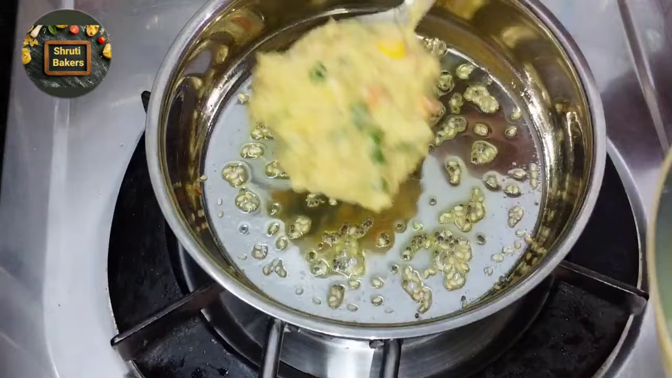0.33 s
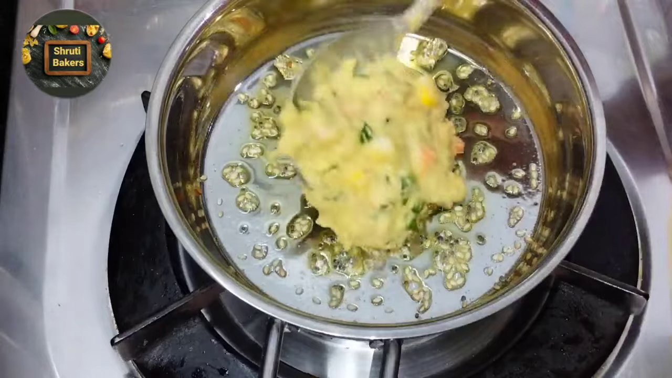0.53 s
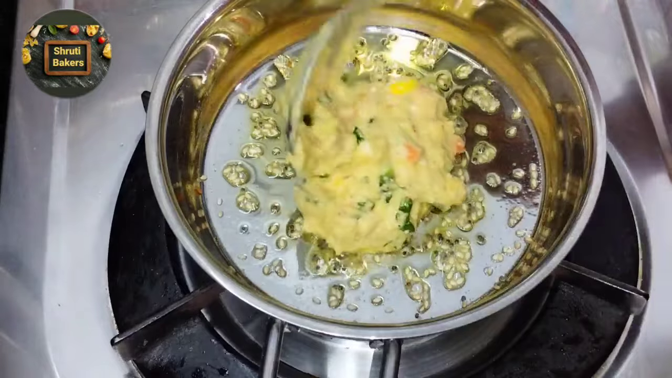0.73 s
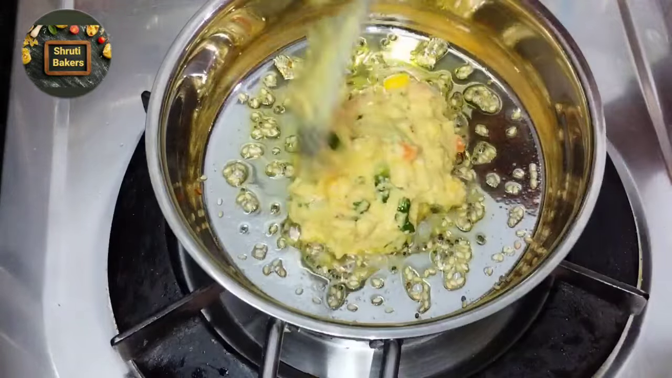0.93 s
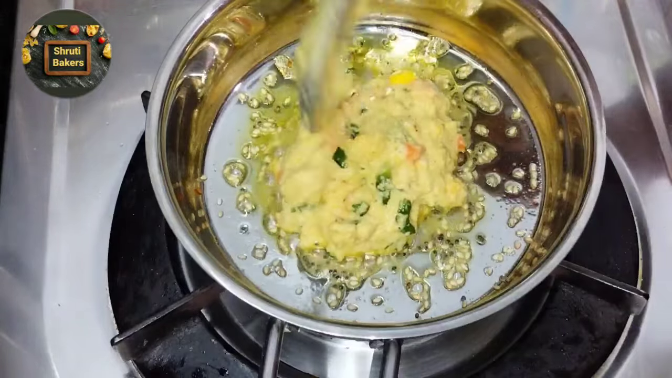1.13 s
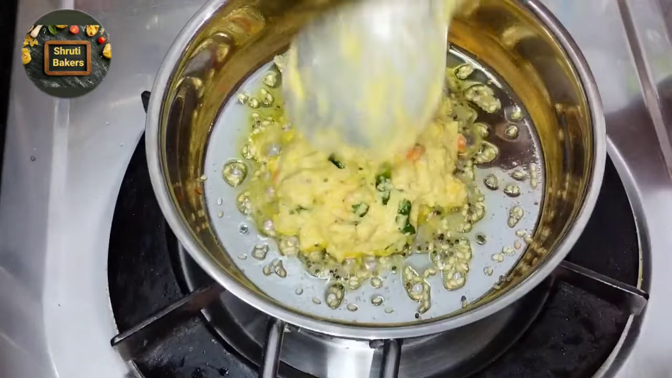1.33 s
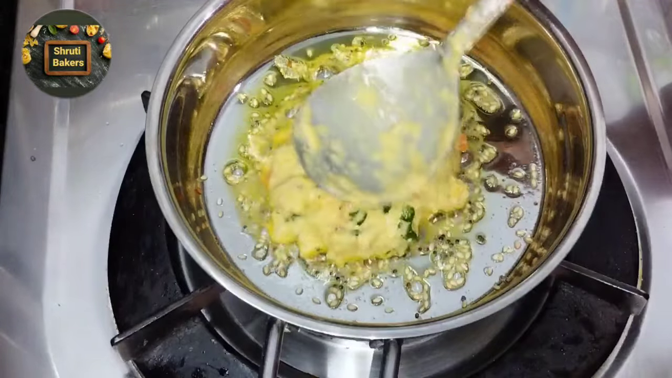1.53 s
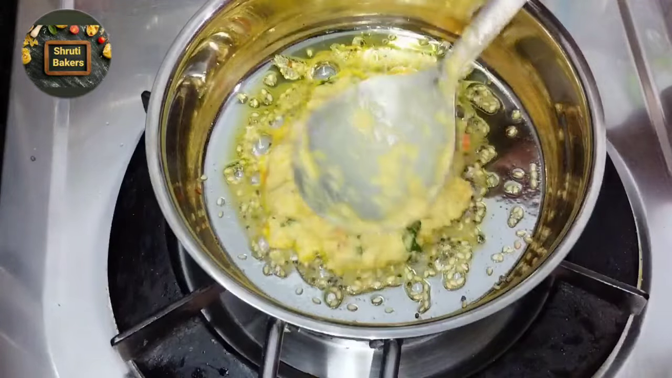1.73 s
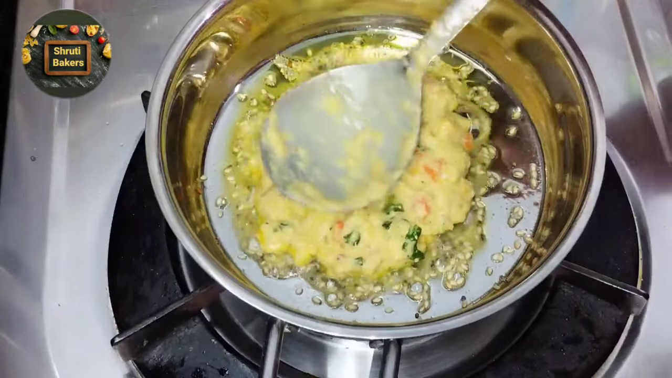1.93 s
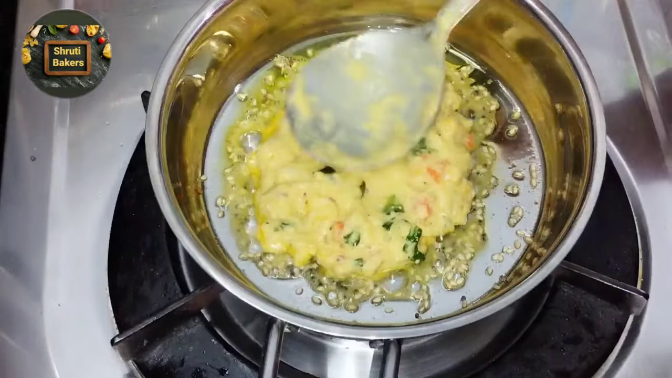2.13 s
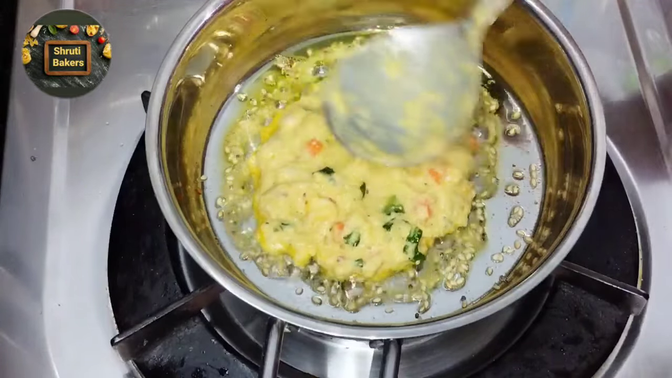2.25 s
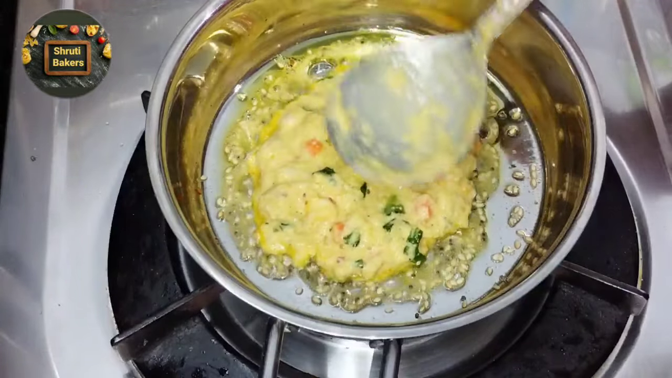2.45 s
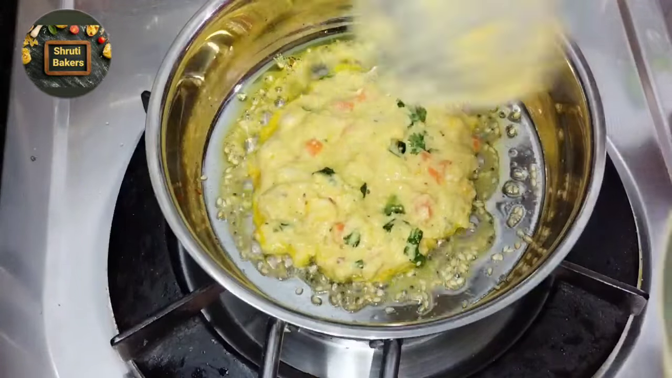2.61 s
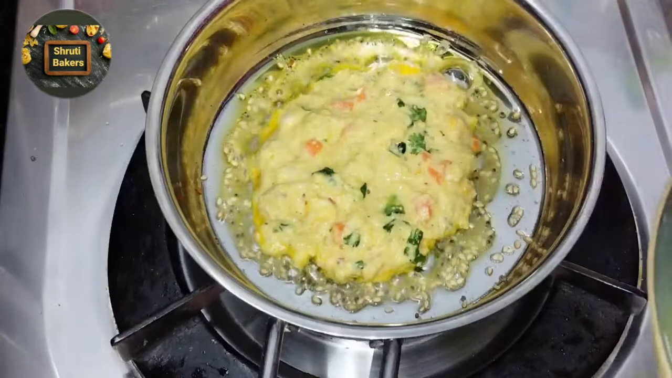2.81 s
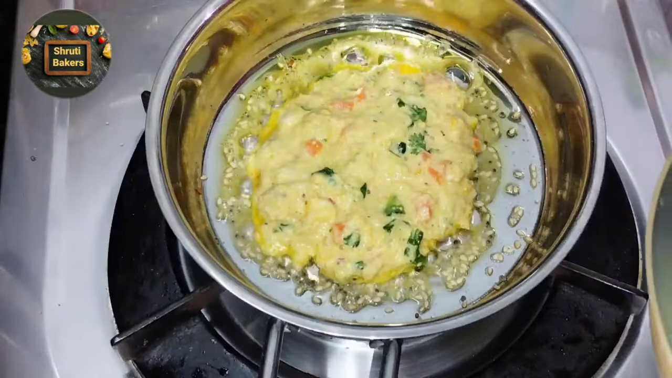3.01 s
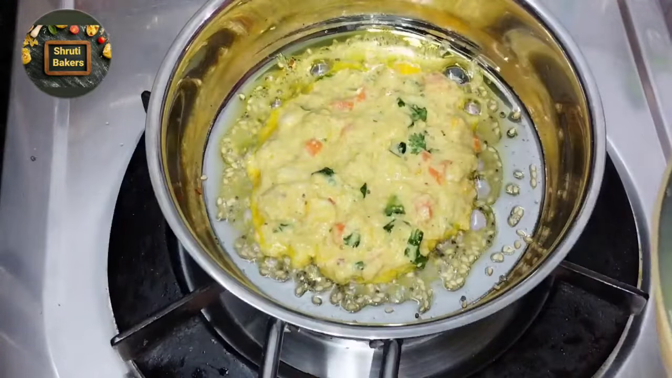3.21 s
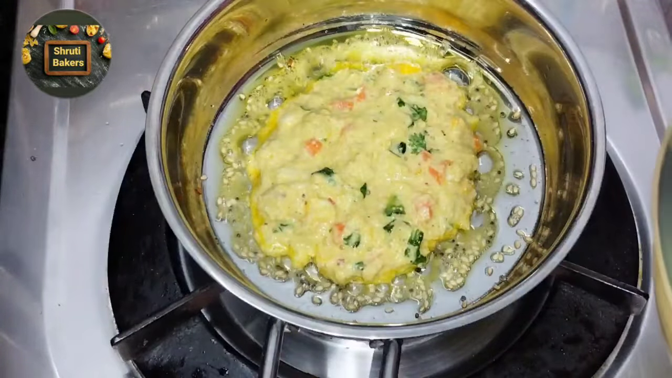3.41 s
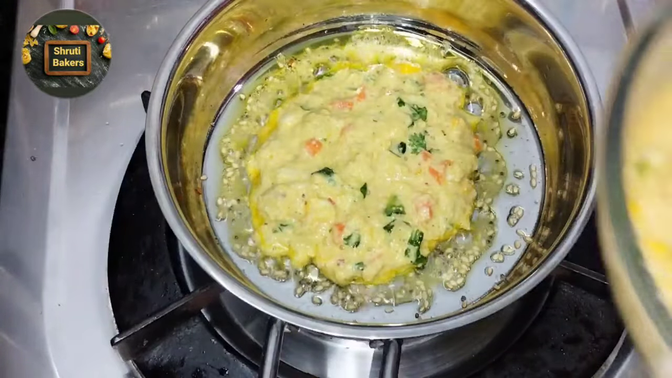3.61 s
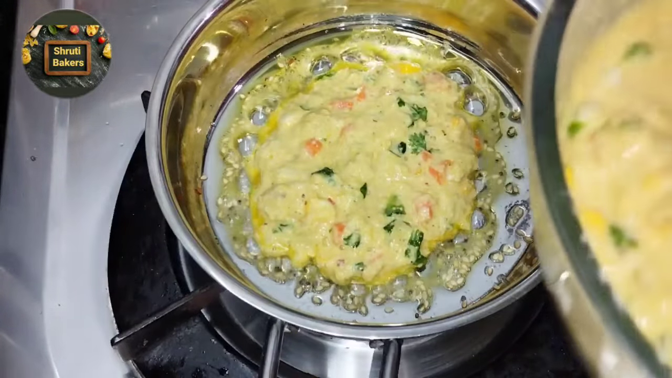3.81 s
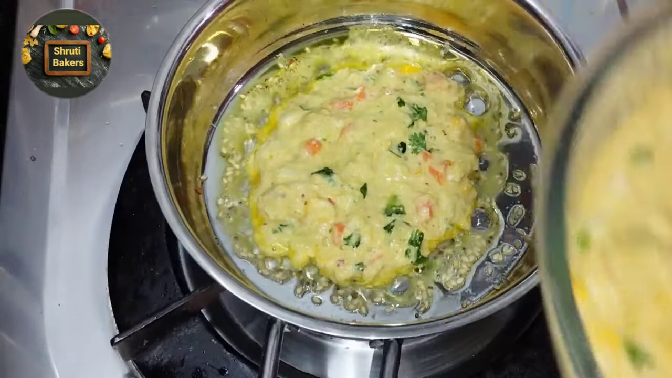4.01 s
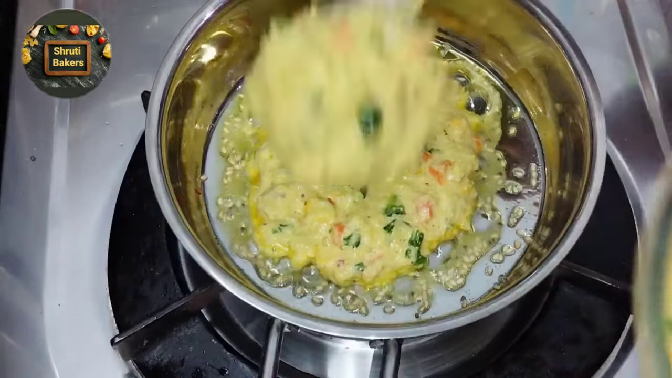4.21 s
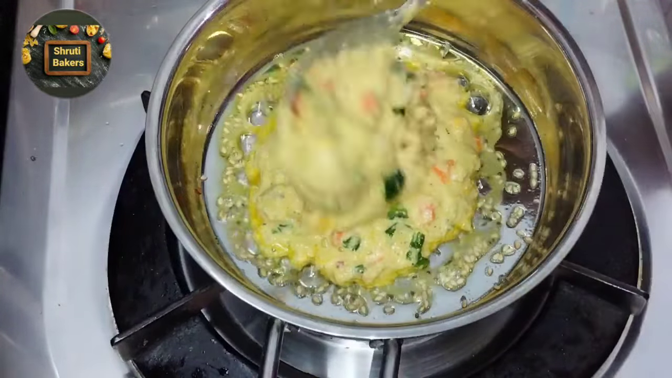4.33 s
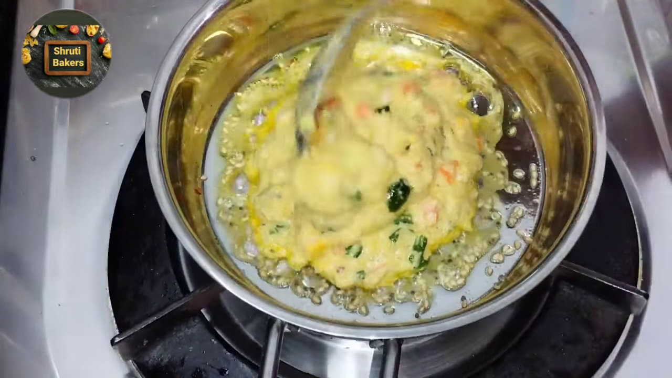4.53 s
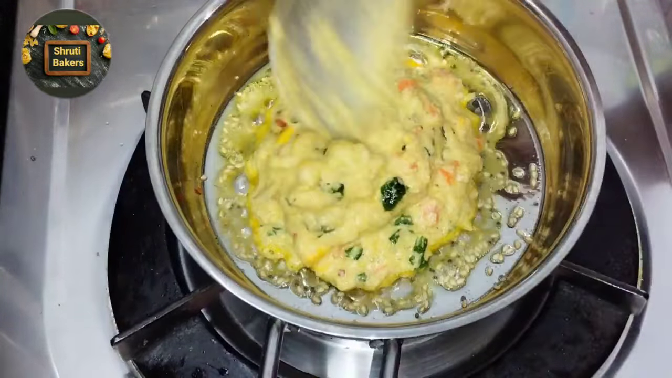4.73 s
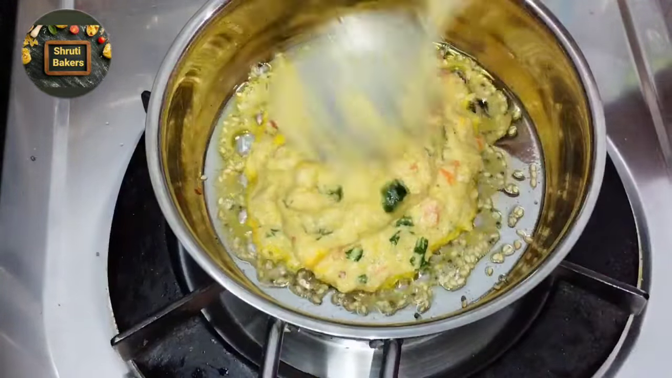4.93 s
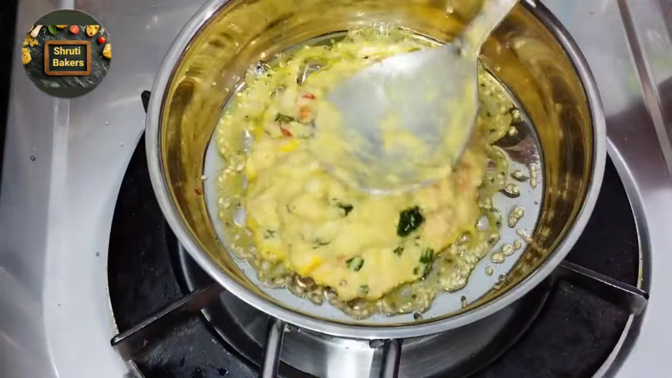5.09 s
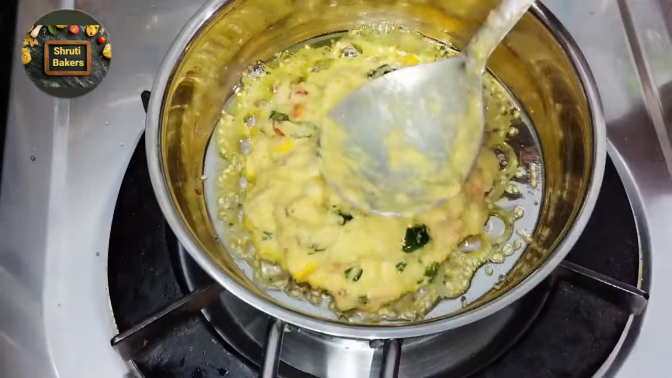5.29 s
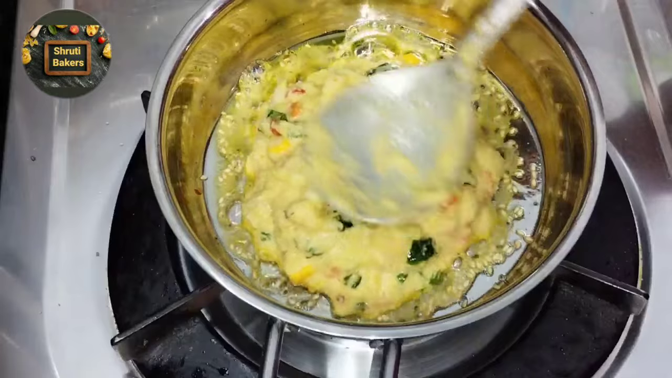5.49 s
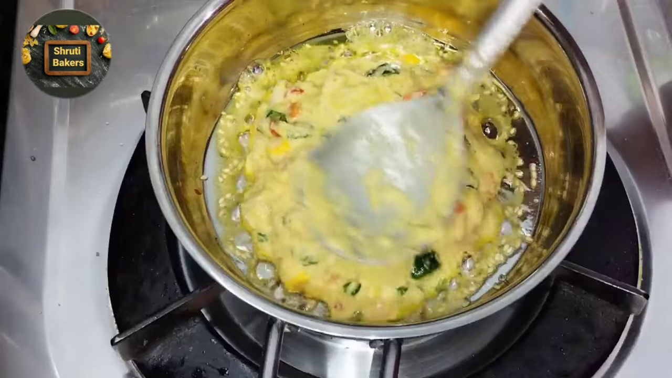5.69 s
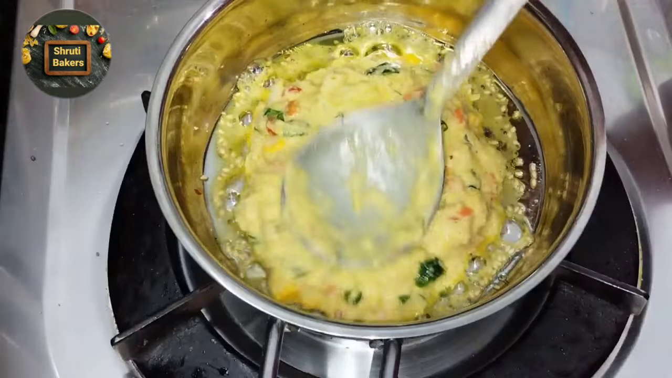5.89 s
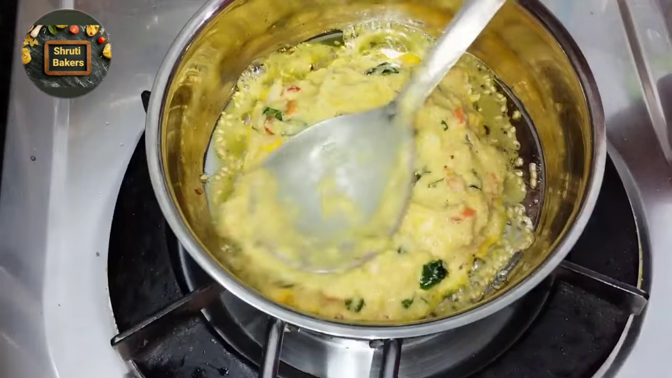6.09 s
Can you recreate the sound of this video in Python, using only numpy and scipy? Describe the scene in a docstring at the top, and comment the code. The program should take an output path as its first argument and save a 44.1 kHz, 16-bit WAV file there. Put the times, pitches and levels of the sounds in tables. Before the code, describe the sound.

Wet batter drops into hot oil in a steel pan and bursts into bright crackling sizzle, fades, then swells again with a second ladleful.

```python
"""Batter fries in hot oil in a steel pan, heard close: two ladlefuls are dropped and spread.
Each is a rising and fading mass of random bubble bursts, coloured by the pan; flares swell in it.
Pops are short decaying sines for the crack, with a hiss of flung oil and a knock on the pan.
A fan hums underneath as wavering tones over filtered noise; a gas burner whistles thinly in narrow
bands and fades over the first three seconds."""
import sys
import numpy as np
from scipy import signal
from scipy.fft import rfft, irfft, next_fast_len
from scipy.io import wavfile
from scipy.ndimage import uniform_filter1d, map_coordinates

SR = 44100
rng = np.random.default_rng(int(sys.argv[2]) if len(sys.argv) > 2 else 0)


def output_pcm(signal):
    """Save a mono or channel-first signal as 16-bit PCM at the path in sys.argv[1].

    Samples are clipped to [-1, 1] before scaling.
    """
    pcm = np.clip(np.atleast_2d(signal).T, -1, 1) * 32767
    wavfile.write(sys.argv[1], SR, np.round(pcm).astype(np.int16))


N = 271215


def amp(db):
    """Decibels to gain."""
    return 10 ** (np.asarray(db) / 20)


def unit(x):
    """x at rms 1."""
    return x / np.sqrt(np.mean(x ** 2) + 1e-20)


def along(points, hz):
    """(Hz, value) points read on a log frequency axis."""
    f, v = np.transpose(points)
    return np.interp(np.log(hz + 1), np.log(f + 1), v)


def clock():
    """The time of every sample in seconds."""
    return np.arange(N) / SR


def wobble(rate):
    """A smooth random curve with this many knots a second."""
    knots = rng.standard_normal(int(N * rate / SR) + 4)
    return map_coordinates(knots, [clock() * rate])


def filtered(x, response):
    """x times a response of frequency."""
    m = next_fast_len(N + SR // 2)
    hz = np.fft.rfftfreq(m, 1 / SR)
    return irfft(rfft(x, m) * response(hz), m)[:N]


def band(x, centre_hz, width_hz):
    """The part of x around one frequency."""
    return filtered(x, lambda hz: np.exp(-((hz - centre_hz) / width_hz) ** 2))


# Hum lines of the fan. Each row: pitch in Hz, rms level in dB before the slow drift, unsteadiness 0-1.
HUM_LINES = [(63.4, -57, 0.5), (88.9, -40.5, 0.02), (141.3, -62, 0.1), (177.4, -55, 0), (220, -60.5, 0.66),
             (274.5, -64.5, 0.28), (298.7, -63.5, 1)]
# Tone colour of the air rush. Each row: frequency in Hz, relative density in dB per Hz.
AIR_COLOUR = [(20, 0.5), (32, 2), (48, -11), (110, -6.5), (220, -8.5), (400, -12.5), (900, -20.5),
              (1600, -22), (2500, -28), (4500, -33), (8500, -27.5), (15000, -43)]
HUM_WAVER_DB = 1.5  # slow drift of the fan's level
HUM_START_DB, HUM_SETTLE_S = -1.5, 1.6  # the fan starts a little softer


def fan():
    """Slightly unsteady hum lines over a soft rush of air, drifting in level together."""
    t = clock()
    hum = 0
    for hz, db, unsteady in HUM_LINES:
        sway = 1 - unsteady + unsteady * (wobble(7) + 1j * wobble(7))
        tone = np.exp(2j * np.pi * (hz * t + rng.random()))
        hum = hum + amp(db) * unit(np.real(sway * tone))
    rush = filtered(rng.standard_normal(N), lambda hz: amp(along(AIR_COLOUR, hz)))
    air = amp(-49) * unit(rush)
    start_db = HUM_START_DB * np.maximum(1 - t / HUM_SETTLE_S, 0)
    return (hum + air) * amp(HUM_WAVER_DB * wobble(5) + start_db)


# Whistle bands of the gas jet. Each row: centre in Hz, width in Hz, rms level in dB before the fade.
WHISTLE_BANDS = [(1030, 29, -72), (1320, 36, -67.5), (1960, 62, -65), (2710, 22, -74), (3184, 34, -57.5),
                 (3670, 30, -68)]


def burner():
    """The gas jet sings in a few narrow, restless bands and soon fades."""
    t = clock()
    whistle = 0
    for hz, width_hz, db in WHISTLE_BANDS:
        flutter = 1.1 + wobble(2 * width_hz) + 1j * wobble(2 * width_hz)
        whistle = whistle + amp(db) * unit(np.real(flutter * np.exp(2j * np.pi * hz * t)))
    return whistle * np.interp(t, [0, .5, 1.5, 3], [0.88, 0.91, 0.45, 0.05])


# Resonances of the pan and the air in it. Each row: centre in Hz, width in Hz, boost in dB.
PAN_RESONANCES = [(707, 160, 7.5), (973, 30, 8), (1130, 120, 0), (1387, 71, 2), (1830, 17, 7.5),
                  (1913, 53, 3), (2050, 58, 4.5), (2900, 310, 5), (3120, 40, 5.5), (3660, 62, 6),
                  (3940, 21, 6), (4530, 45, 4), (4700, 36, 0.5)]


def click(colour, size=4096):
    """One burst in the pan: the causal impulse of this colour with the pan's resonances, energy 1."""
    hz = np.fft.rfftfreq(size, 1 / SR)
    db = along(colour, hz)
    for centre_hz, width_hz, boost_db in PAN_RESONANCES:
        db = db + boost_db / (1 + (2 * (hz - centre_hz) / width_hz) ** 2)
    # fold the cepstrum forward so that the sound starts at once (minimum phase)
    cepstrum = irfft(np.log(amp(db)))
    cepstrum[1:size // 2] *= 2
    cepstrum[size // 2 + 1:] = 0
    pulse = irfft(np.exp(rfft(cepstrum)))
    return pulse / np.linalg.norm(pulse)


def bursts(rate, spread_db):
    """Impulses of uneven size and random sign at random moments, rate a second, at rms 1."""
    chance = np.clip(rate / SR, 1e-5, 1)
    size_db = spread_db * np.clip(rng.standard_normal(N), -2, 2)
    size = amp(size_db) * rng.choice([-1, 1], N)
    return unit(size * (rng.random(N) < chance) / np.sqrt(chance))  # even power at any rate


def kitchen(x, t60, wet_db, count=4):
    """x with the quick echoes of pan wall, stove and tiles; each spot of the pan echoes differently."""
    t = np.arange(SR // 3) / SR
    tails = rng.standard_normal((count, len(t))) * amp(-60 * t / t60) * (t > .001)
    spot = rng.integers(count, size=N)
    echoes = 0
    for k, tail in enumerate(tails):
        echoes = echoes + signal.fftconvolve(x * (spot == k), tail / np.linalg.norm(tail))[:N]
    return x + amp(wet_db) * echoes


POP_HZ, POP_SCATTER = 8400, 0.07  # usual ring of a cavity, its relative spread among the lesser pops
SMALL_CRACK_DB, SMALL_SPRAY_DB, SMALL_KNOCK_DB = 2, -10, -27  # row levels against the steady fizz
SMALL_POP_SPREAD_DB = 5  # how far they stray in strength, up or down


def small_pops(steady, count):
    """Rows of lesser pops at random moments once the batter is in the oil, stronger in harder frying."""
    when, size, pitch = rng.random((count, 3)).T
    landing_s = LADLEFULS[0][0]
    times = landing_s + when * (N / SR - landing_s)
    fizz_db = 10 * np.log10(np.interp(times, clock(), steady))
    db = fizz_db + SMALL_POP_SPREAD_DB * (2 * size - 1)
    ring_hz = POP_HZ * np.exp(POP_SCATTER * (2 * pitch - 1))
    return zip(times, db + SMALL_CRACK_DB, db + SMALL_SPRAY_DB, ring_hz, db + SMALL_KNOCK_DB)


# Water pops in the oil. Each row: start in seconds, relative crack level in dB, relative spray level
# in dB, ring of the cavity in Hz, relative knock on the pan in dB.
WATER_POPS = [(0.3123, -16.5, -25, 9000, -45), (0.3647, -17.5, -33.5, 8200, -36),
              (0.9485, -15, -31, 8500, -39), (1.1852, -19, -38, 8800, -49), (1.3596, -19, -24, 9400, -51),
              (1.5684, -10, -32, 8600, -33), (1.6565, -18, -29, 8500, -30), (2.3786, -11.5, -28, 9400, -47),
              (2.4293, -11, -24, 8160, -23), (2.6119, -17, -34, 8400, -41), (2.806, -16, -27, 6600, -36),
              (3.0852, -9, -19, 8150, -37), (3.2869, -15, -27.5, 8900, -31.5),
              (3.568, -4.5, -26, 8300, -23.5), (3.749, -14, -22, 9300, -25),
              (3.8828, -19.5, -31.5, 8250, -40), (4.1547, -25, -36, 8200, -44),
              (4.2086, -20, -32.5, 9200, -43), (4.4835, -23, -31, 7800, -38),
              (4.9133, -8.5, -31, 7960, -26.5), (4.9903, -17, -45, 7700, -54), (5.8535, -7, -24, 8100, -37)]
# Tone colour of a pop's spray. Each row: frequency in Hz, relative density in dB per Hz.
SPRAY_COLOUR = [(150, -27), (500, -28), (1500, -21), (4000, -16.5), (6000, -5.5), (8200, 3.5),
                (10500, -1.5), (13000, -5), (16000, -13)]
# Tone colour of a pop's knock on the pan. Each row: frequency in Hz, relative density in dB per Hz.
KNOCK_COLOUR = [(100, -23), (300, 0), (800, 3.5), (1600, 10), (3000, 10), (6000, -4), (16000, -7)]
TEAR_SHARE, TEAR_GROWS = 0.3, 5.9  # film tear at the usual ring; it grows as this power of the pitch


def pops():
    """Each pop is a sharp crack that knocks the pan; its flung droplets hiss away on the hot steel."""
    t = np.arange(SR // 3) / SR
    cracks, knocks, spray_level = np.zeros((3, N + SR))
    fading = amp(-60 * t / 0.16) + 1.04 * amp(-60 * t / 0.015)
    tear = np.sin(2 * np.pi * 12800 * t) * amp(-60 * t / .0006)
    steady, _ = batter()
    for s, crack_db, spray_db, hz, knock_db in [*WATER_POPS, *small_pops(steady, count=22)]:
        at = round(s * SR)
        # the oil film tears and the opened cavity rings for a few cycles
        cavity = np.sin(2 * np.pi * hz * t) * amp(-60 * t / .0011)
        flow = cavity + TEAR_SHARE * (hz / POP_HZ) ** TEAR_GROWS * tear
        # changing flow is what radiates
        cracks[at:at + len(t)] += amp(crack_db + 15) * np.diff(flow, prepend=0)
        knocks[at] += amp(knock_db + 16)
        spray_level[at:at + len(t)] += amp(spray_db + 0.5) * fading
    near_wall = np.roll(cracks, round(.0005 * SR))
    far_wall = np.roll(cracks, round(.00124 * SR))
    cracks = (cracks + 0.059 * near_wall + 0.16 * far_wall)[:N]
    spray = kitchen(spray_level[:N] * bursts(5000, spread_db=3.5), t60=0.27, wet_db=-4)
    spray = signal.fftconvolve(spray, click(SPRAY_COLOUR))[:N]
    knocks = kitchen(knocks[:N], t60=0.17, wet_db=-7.5)
    knocks = signal.fftconvolve(knocks, click(KNOCK_COLOUR))[:N]
    return cracks + spray + knocks


# Ladlefuls of batter; the second lands on the first and reaches the oil slowly.
# Each row: landing in seconds, relative fizz level in dB, rise in seconds, time it stays wet in seconds.
LADLEFULS = [(0.525, -20, 0.16, 1.66), (4.3, -26, 1.45, 1.75)]
SAG_DB_PER_S, CRUST_DB_PER_S = 1.5, 9  # the sizzle sags while wet, then also fades as a crust forms
SIMMER_DB = -35.5  # the rim of the batter keeps simmering
LANDING_S = 0.02  # the batter takes a moment to touch down
GROW_S = 0.31  # time the large bubbles take to grow


def batter():
    """Steady frying power and freshness of the batter: each ladleful rises, sags, then crusts over."""
    t = clock()
    touchdown = np.clip((t - LADLEFULS[0][0]) / LANDING_S, 0, 1)
    power = amp(SIMMER_DB) ** 2 * touchdown + 1e-9
    fresh = 0
    for s, db, rise_s, wet_s in LADLEFULS:
        age = np.maximum(t - s, 0)
        contact = np.minimum(age / rise_s, 1)
        sag_db = SAG_DB_PER_S * np.clip(age - rise_s, 0, wet_s)
        crust_db = CRUST_DB_PER_S * np.maximum(age - wet_s, 0)
        power = power + (contact * amp(db - sag_db - crust_db)) ** 2
        fresh = fresh + (t > s) * np.exp(-(age / (GROW_S + rise_s / 2)) ** 2)
    return power, fresh


# Flares, where a push of the ladle or a slump brings wet batter onto hot steel.
# Each row: peak in seconds, relative fizz level in dB, relative fine spitting level in dB.
FLARE_SWELLS = [(0.6, -31.5, -31.5), (0.75, -20.5, -42), (1.3, -31, -32), (1.9, -23.5, -48),
                (2.57, -25.5, -42), (2.95, -38, -36), (3.53, -31.5, -44), (4.52, -43, -35.5),
                (4.68, -34, -39), (5.11, -27.5, -51), (5.308, -25, -35), (5.498, -26, -34),
                (5.71, -25, -42), (5.93, -24, -31.5), (6.07, -41, -35.5)]
FLARE_RISE_S, FLARE_FALL_S = 0.028, 0.085  # a flare swells quickly and dies more slowly


def flares():
    """Power that wet batter on hot steel adds to the fizz and to the fine spitting."""
    t = clock()
    fizz = spit = 0
    for s, fizz_db, spit_db in FLARE_SWELLS:
        swell = np.exp(-((t - s) / np.where(t < s, FLARE_RISE_S, FLARE_FALL_S)) ** 2)
        fizz = fizz + amp(fizz_db) ** 2 * swell
        spit = spit + amp(spit_db) ** 2 * swell
    return fizz, spit


# Tone colour of the bursting bubbles. Each row: frequency in Hz, relative density in dB per Hz.
BUBBLE_COLOUR = [(250, -36.5), (600, -33), (1200, -24.5), (1700, -19.5), (2400, -23), (3450, -24.5),
                 (4200, -20.5), (5000, -14.5), (6200, -6), (7900, 0.5), (8800, -0.5), (10000, -6.5),
                 (11500, -12.5), (15500, -20.5)]
FULL_BOIL_DB = -16  # fizz level that counts as full boil
BODY_DB, BODY_SLOPE = -37, 0.72  # pan body at full boil, its dB per dB of fizz
BODY_FLARE_SHARE = 0.73  # weight of the flares in the body
SPIT_DB, SPIT_SLOPE = -27.5, 0.77  # fine spitting at full boil, its dB per dB of fizz
SPIT_WAVER_DB = 0.4  # the fine spitting comes and goes on its own
LARGE_DB, FRESH_DB = 1.92, -2  # share of large bubbles, their lack in fresh batter


def boil(power):
    """Frying strength, 1 at full boil."""
    return np.sqrt(power) / amp(FULL_BOIL_DB)


def below(hz, edge_hz):
    """Response of a steep low-pass."""
    return 1 / (1 + (hz / edge_hz) ** 12)


def sizzle():
    """Tiny bubbles merge into a fizz and larger ones tick through it; harder frying makes more of both."""
    t = clock()
    steady, fresh = batter()
    flare, flare_spit = flares()
    vigour = boil(steady + flare)

    fizz_gain = np.sqrt(steady + flare)
    body_gain = amp(BODY_DB) * boil(steady + BODY_FLARE_SHARE * flare) ** BODY_SLOPE
    steady_spit = amp(SPIT_DB) * boil(steady) ** SPIT_SLOPE
    spit_gain = np.hypot(steady_spit, np.sqrt(flare_spit)) * amp(SPIT_WAVER_DB * wobble(12))

    fine = bursts(1500 + 24000 * vigour, spread_db=4)
    coarse = bursts(90 + 3200 * vigour ** 2, spread_db=4.5)
    clumps = amp(0.32 * wobble(30) + 0.67 * wobble(140))  # bubbles go off in clumps
    steam = (fine + amp(-4.5) * coarse) * clumps
    sound = kitchen(steam, t60=0.065, wet_db=-3.5)
    sound = signal.fftconvolve(sound, click(BUBBLE_COLOUR))[:N]

    # three registers, each with its own level: pan body, fizz and fine spitting
    body = unit(filtered(sound, lambda hz: below(hz, edge_hz=4240)))
    covered = np.interp(t, [4.3, 5.2], [0, .3])  # the second ladleful damps the pan's lower ring
    body = body - covered * band(body, centre_hz=1620, width_hz=310)
    fizz = unit(filtered(sound, lambda hz: below(hz, edge_hz=9350) - below(hz, edge_hz=4300)))
    spit = unit(filtered(sound, lambda hz: 1 - below(hz, edge_hz=10060)))
    frying = body_gain * body + amp(-1.79) * fizz_gain * fizz + spit_gain * spit

    large = amp(LARGE_DB + FRESH_DB * fresh)
    return frying + (large - 1) * band(frying, centre_hz=3820, width_hz=1700)


def scene():
    """Everything heard from just above the pan."""
    return (fan() + burner() + pops() + sizzle())[None]


# Brief dips of the overall level. Each row: start in seconds, end in seconds, gain in dB.
LEVEL_DIPS = [(1.363, 1.459, -7.5), (1.661, 1.764, -6.5), (2.575, 2.607, -2)]


def record(dry):
    """The level dips briefly a few times; peaks are rounded off and the top of the band is cut."""
    t = clock()
    dip_db = sum(db * ((t > start) & (t < end)) for start, end, db in LEVEL_DIPS)
    x = dry[0] * amp(uniform_filter1d(dip_db, size=200))  # softened edges
    x = x / (1 + (x / .9) ** 4) ** (1 / 4)
    return filtered(x, lambda hz: hz < 15600)[None]


dry = scene()
out = record(dry)
output_pcm(out)
```